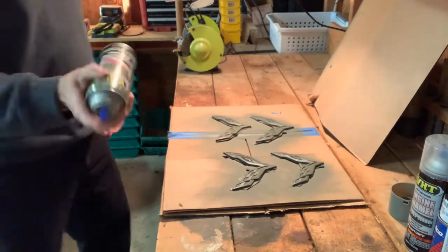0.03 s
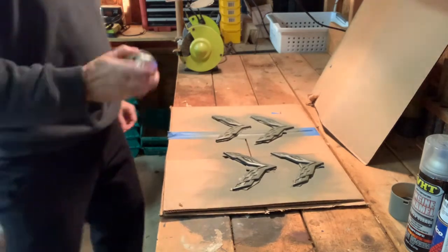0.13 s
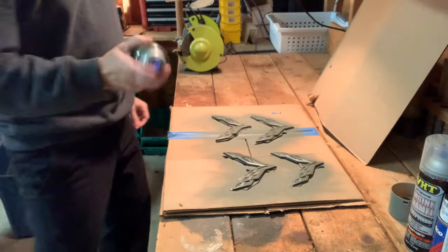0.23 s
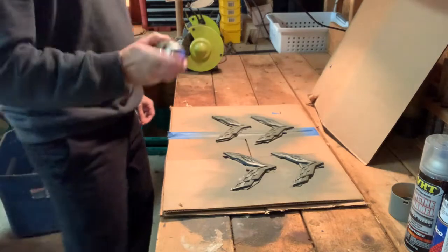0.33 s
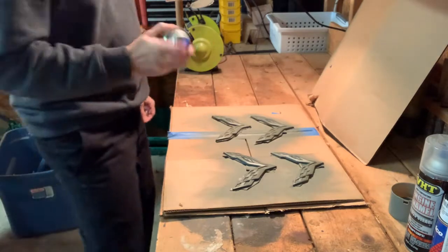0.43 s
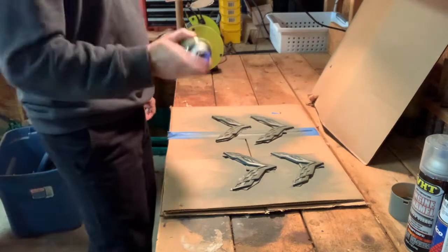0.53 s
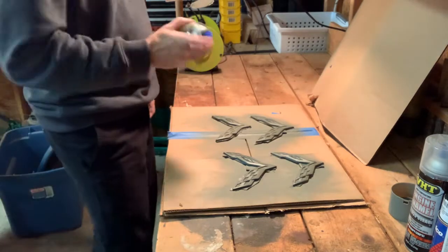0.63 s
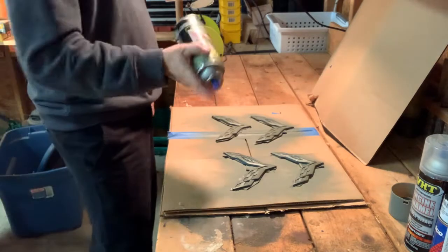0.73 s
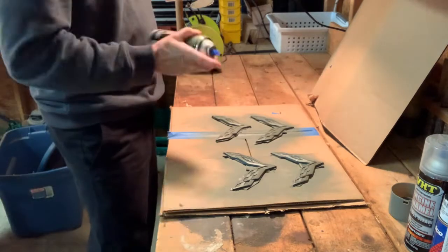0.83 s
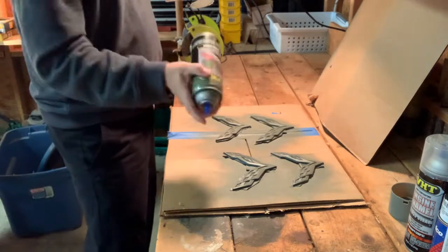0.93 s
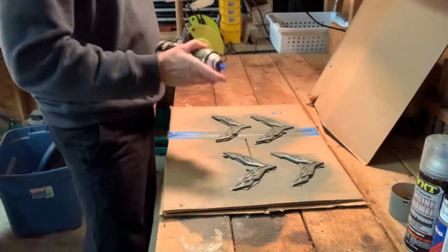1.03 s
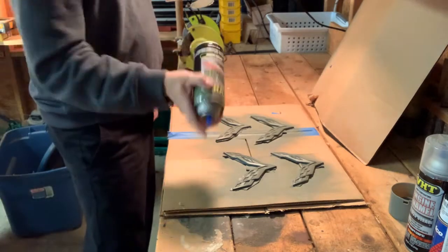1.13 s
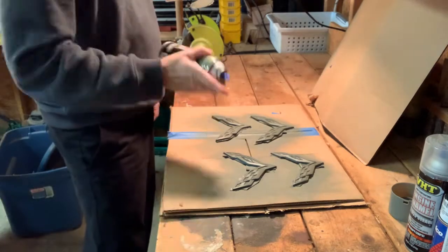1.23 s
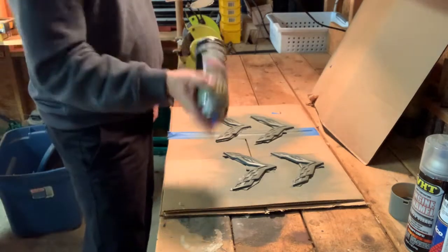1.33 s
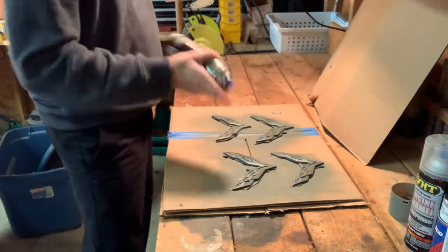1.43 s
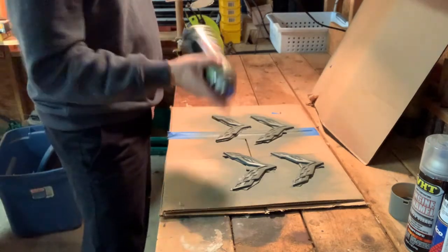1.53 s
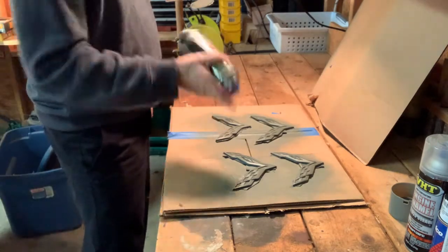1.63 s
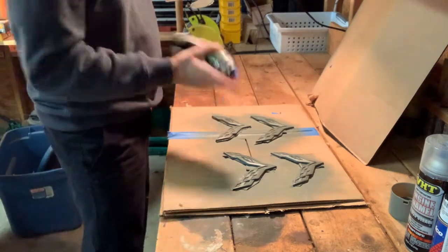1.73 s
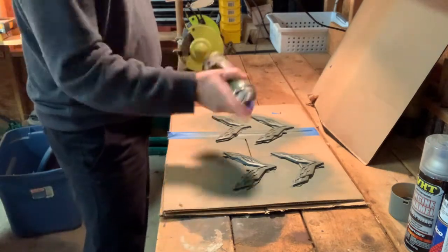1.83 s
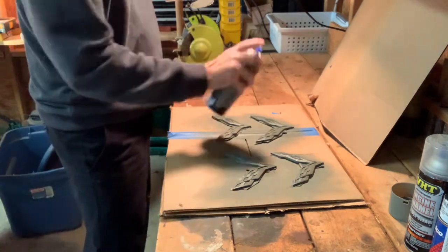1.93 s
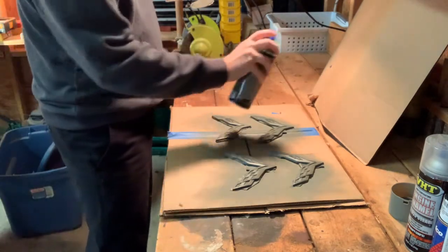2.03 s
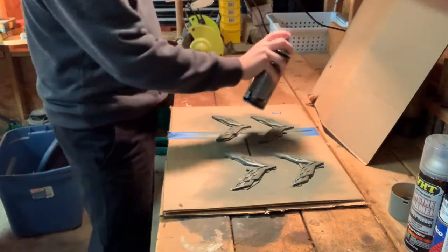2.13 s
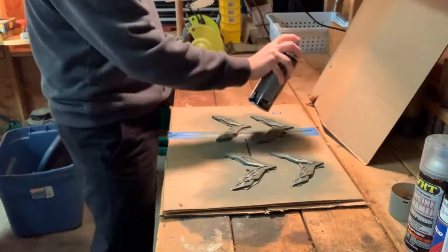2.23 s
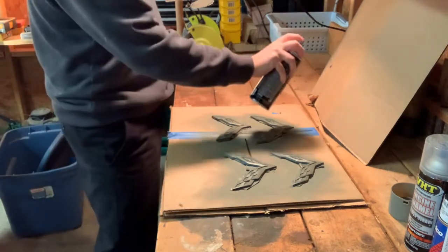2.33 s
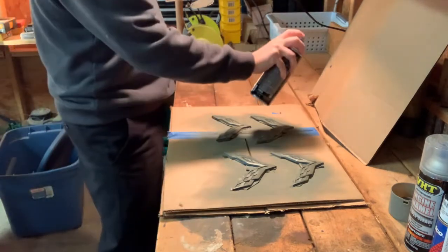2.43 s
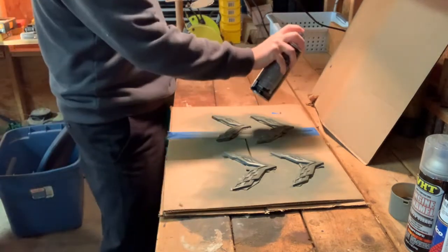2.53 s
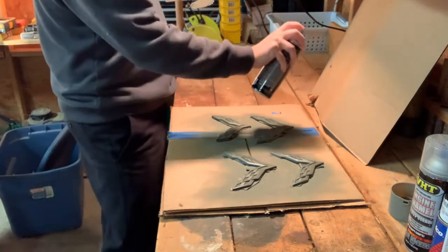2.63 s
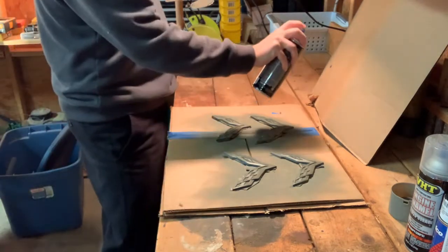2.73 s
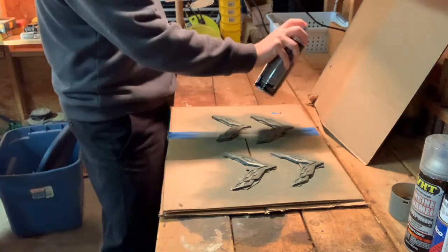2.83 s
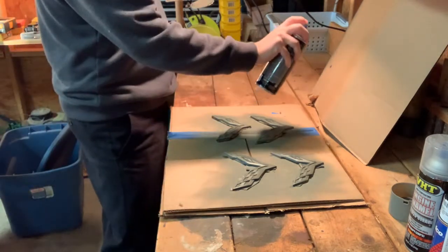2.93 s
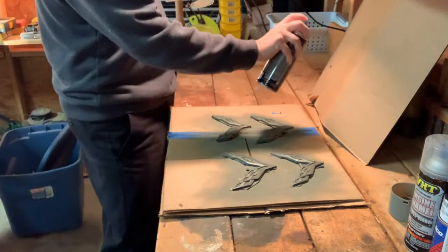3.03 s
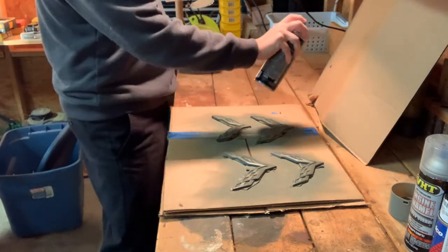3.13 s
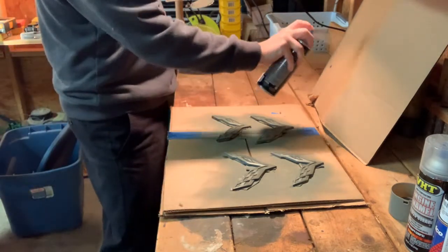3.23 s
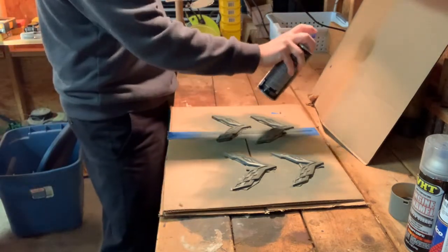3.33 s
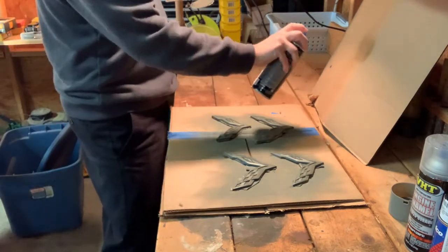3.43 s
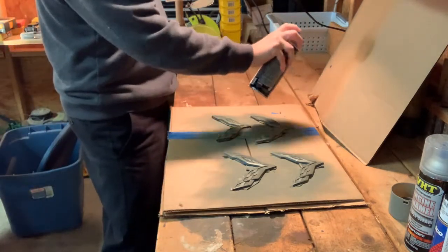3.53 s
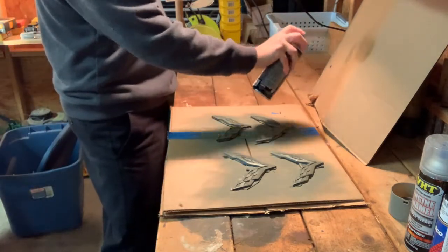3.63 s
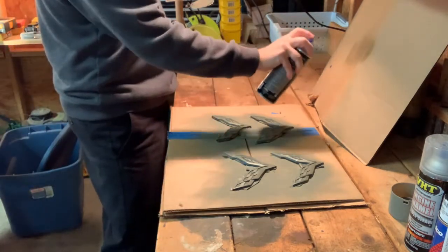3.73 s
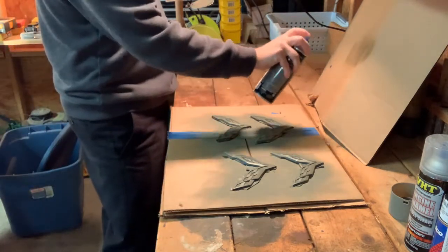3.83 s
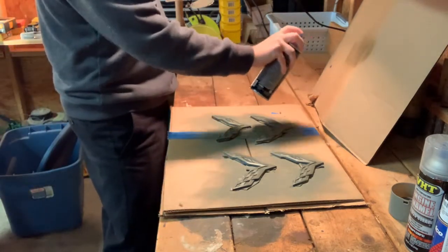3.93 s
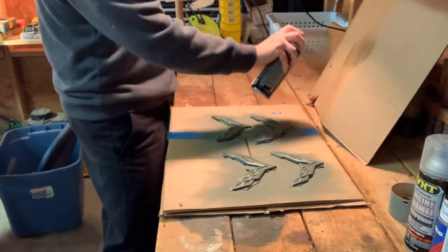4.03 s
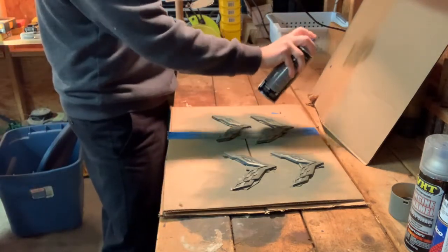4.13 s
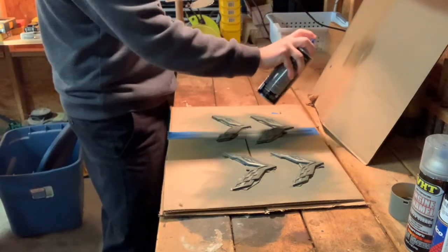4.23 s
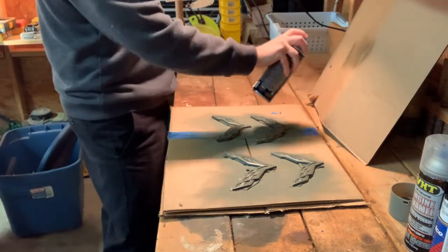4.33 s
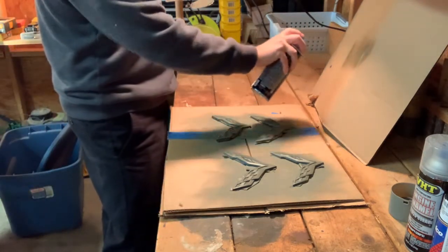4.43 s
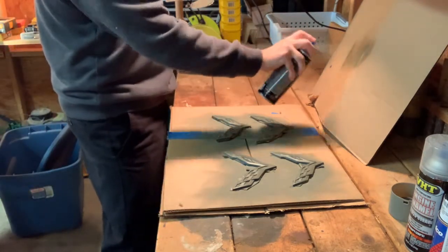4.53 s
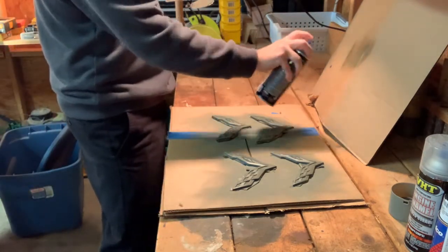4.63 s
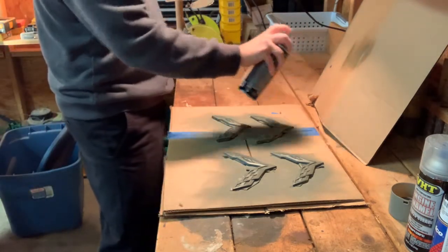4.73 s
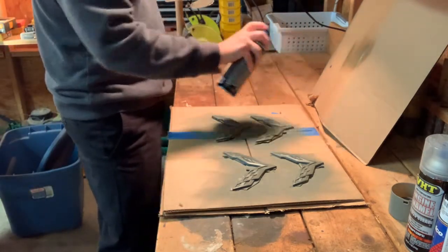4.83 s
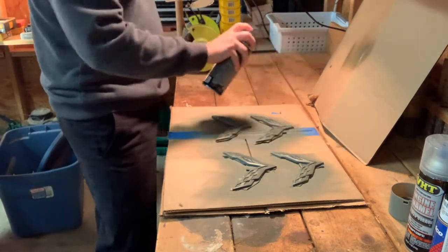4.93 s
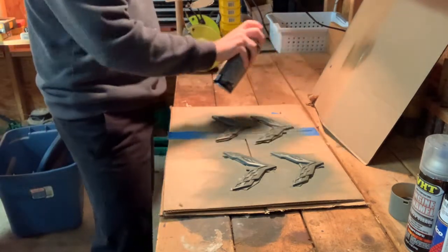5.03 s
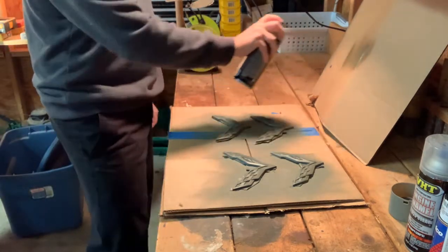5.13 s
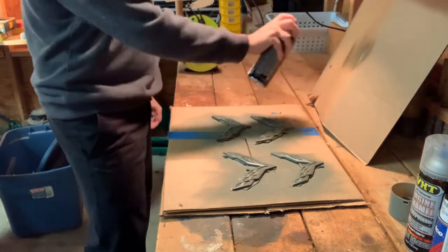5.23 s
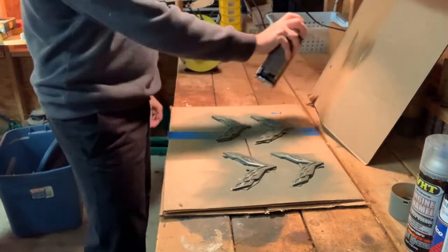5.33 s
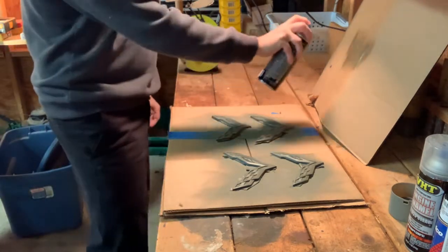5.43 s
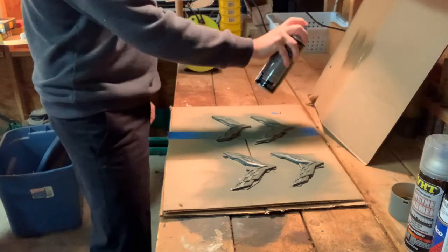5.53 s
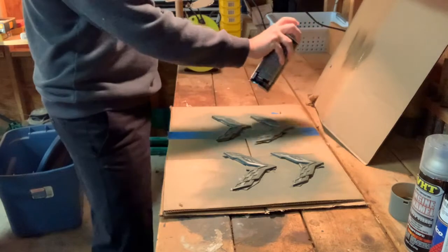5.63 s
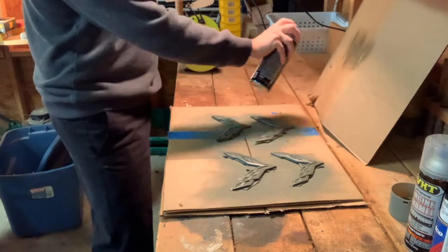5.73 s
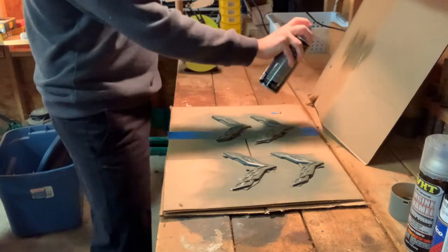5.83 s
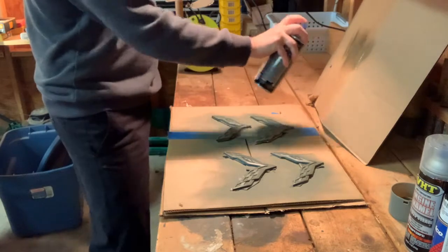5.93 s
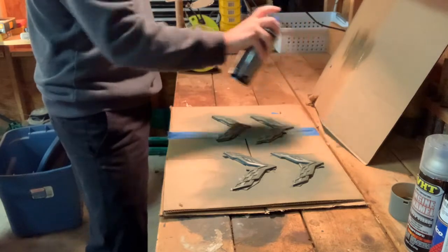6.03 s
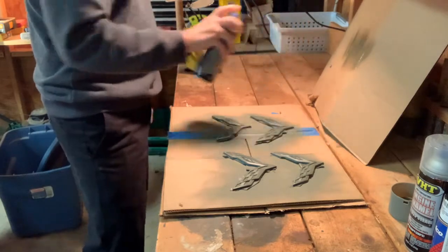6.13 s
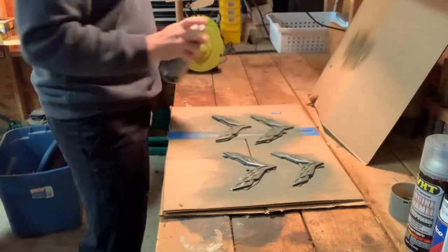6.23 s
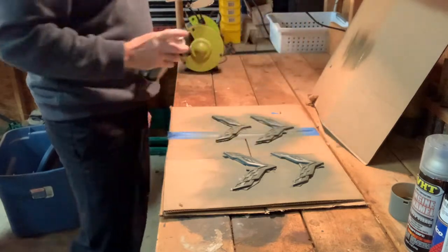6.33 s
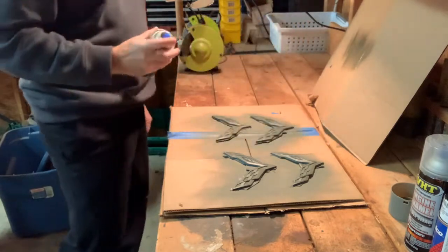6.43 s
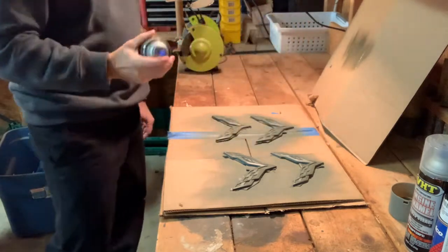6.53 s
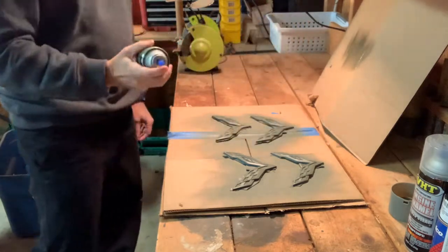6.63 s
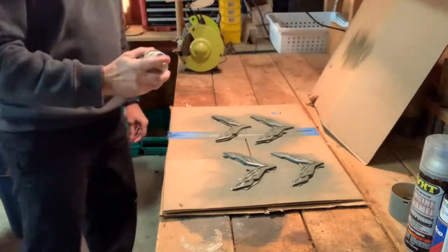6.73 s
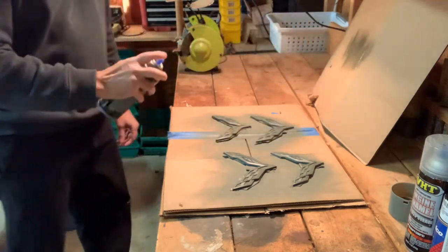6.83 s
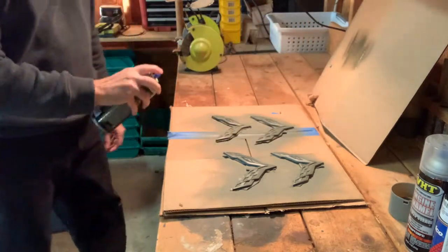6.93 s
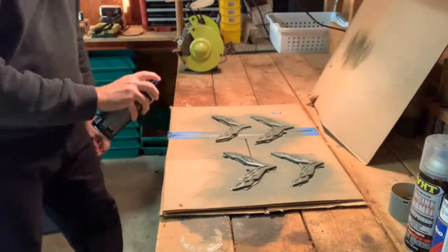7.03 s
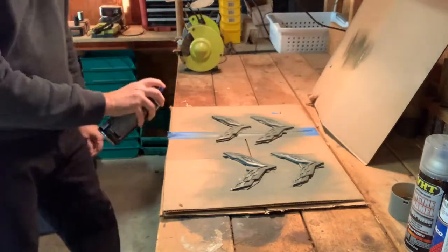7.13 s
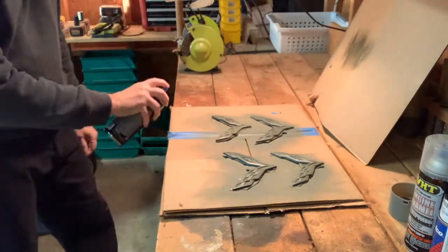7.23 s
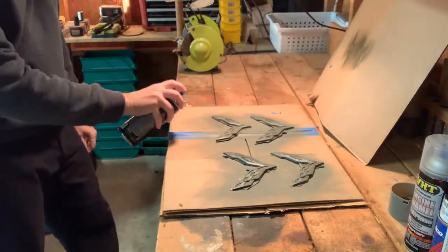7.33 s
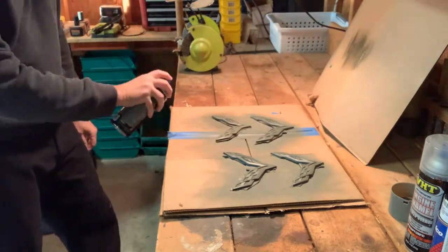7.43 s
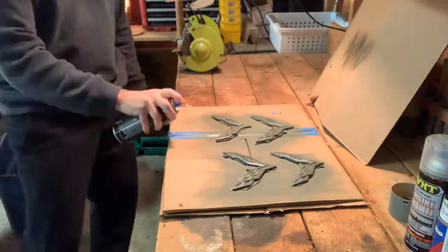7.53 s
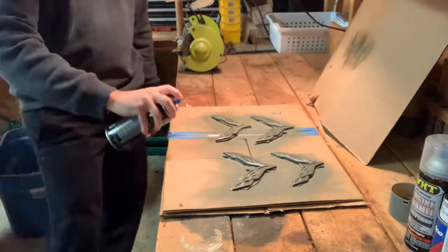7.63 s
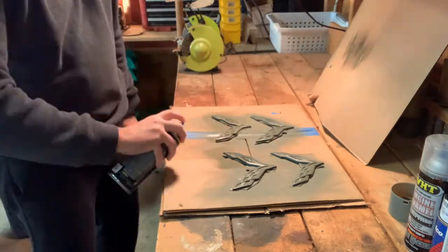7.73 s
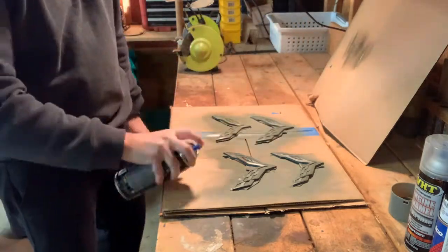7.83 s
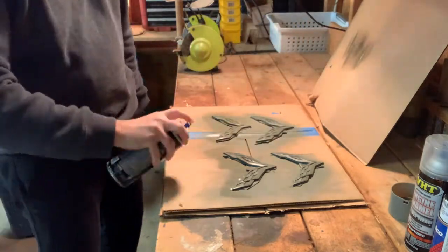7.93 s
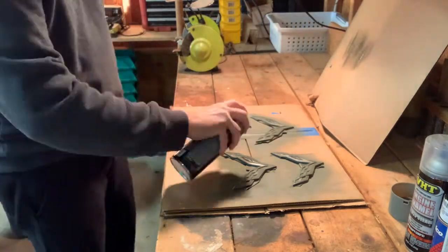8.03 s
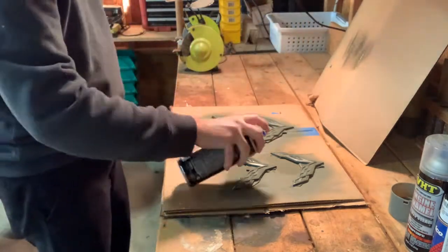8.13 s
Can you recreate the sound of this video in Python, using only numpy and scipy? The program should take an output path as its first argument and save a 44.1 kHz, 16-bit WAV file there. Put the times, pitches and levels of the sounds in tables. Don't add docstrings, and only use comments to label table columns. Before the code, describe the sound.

Rapid metallic ball rattle in a paint can runs down, followed by clicks and brief quiet aerosol hisses, ending in fast choppy noise bursts.

```python
import sys
import numpy as np
from scipy import signal
from scipy.fft import rfft, irfft, next_fast_len
from scipy.io import wavfile
from scipy.ndimage import uniform_filter1d, minimum_filter1d

SR = 44100
rng = np.random.default_rng(int(sys.argv[2]) if len(sys.argv) > 2 else 0)


def output_pcm(signal):
    pcm = np.clip(np.atleast_2d(signal).T, -1, 1) * 32767
    wavfile.write(sys.argv[1], SR, np.round(pcm).astype(np.int16))


def linear_from_db(decibels):
    return 10 ** (np.asarray(decibels, float) / 20)


N = 360738
TIME = np.arange(N) / SR
SPAN = next_fast_len(N, real=True)
HZ = np.fft.rfftfreq(SPAN, 1 / SR) + 1e-3


def on_log(table):
    hz, value = np.transpose(table)
    return np.interp(np.log(HZ), np.log(hz), value)


def level(x, db):
    return x * linear_from_db(db) / np.sqrt(np.mean(x ** 2))


def noise():
    return rng.standard_normal((3, N))


def colour(x, spectrum):
    gain = linear_from_db(on_log(spectrum))
    gain = gain / np.sqrt(np.mean(gain ** 2))
    return irfft(rfft(x, SPAN) * gain, SPAN)[:, :N]


def flicker(rate_hz, db):
    k = int(SR / rate_hz)
    steps = np.repeat(rng.standard_normal(N // k + 1), k)
    return linear_from_db(db * uniform_filter1d(steps, k)[:N])


def swell(x, below_hz, gain):
    low = signal.sosfiltfilt(signal.butter(2, below_hz, fs=SR, output="sos"), x)
    return x + low * (gain - 1)


def ring(modes, t, scatter_db, detune):
    hz, db, t60_s = np.transpose(modes)[:, :, None]
    strength, pitch = rng.standard_normal((len(modes), 2)).T[:, :, None]
    fade = linear_from_db(db + scatter_db * strength) * np.exp(-np.log(1000) * t / t60_s)
    turn = 1.2 * rng.standard_normal((3, len(modes), 1))
    out = (fade * np.sin(2 * np.pi * hz * (1 + detune * pitch) * t + turn)).sum(axis=1)
    return out / np.abs(out).max(axis=1, keepdims=True)


# mode_hz, level_db, t60_s
CAN = [(3170, -5, 0.053), (3420, -2, 0.03), (3360, -7.5, 0.028), (3600, -4, 0.022), (3800, -2, 0.03),
       (3960, -5, 0.05), (4220, 0.5, 0.022), (4342, -3, 0.024), (4705, -1.5, 0.023), (5627, -4, .014),
       (5800, -6.5, 0.016)]
# mode_hz, level_db, t60_s
DOME = [(1474, -1, 0.018), (1830, -11, 0.0052), (2005, 1.5, 0.016), (2159, -1, 0.072), (2654, -5, 0.015)]
# mode_hz, level_db, t60_s
THUD = [(290, -13.5, 0.18), (470, -11.5, 0.091), (872, -2.5, 0.046), (1076, 9, 0.012), (1240, 7.5, 0.015)]
# freq_hz, density_db
TICK = [(4000, -24.5), (6500, 0.5), (9500, -3), (11500, -5.5), (14000, -9.5), (16000, -16.5)]
# freq_hz, density_db
CLATTER = [(500, -20.5), (1200, -12.5), (2100, -6), (2700, -5.5), (3700, -5), (4600, -7.5), (6000, -5.5),
           (9000, -26)]
TICK_DB, TICK_PER_RING = -10, -0.17
SPOT_WIDTH_HZ = 230
SLIDE_DB, SLIDE_S = -22.5, .003
CONTACT_S, PAINT_PUSH_S, CHOKED_S = 0.0004, 0.0021, .016


def ball(hits, bright_db, spots_hz):
    body, tick, rebounds = np.zeros((3, 3, N + 3072))
    t = np.arange(3072) / SR
    touch = 1 - np.exp(-(t / CONTACT_S) ** 2)
    push = 1 - np.exp(-(t / PAINT_PUSH_S) ** 2)
    grip = 0.3 + np.exp(-(t / 0.0028) ** 2)
    for (start_s, db, thud_db, dome_db), extra_db, spot_hz in zip(hits, bright_db, spots_hz):
        tick_db = TICK_DB + TICK_PER_RING * db + extra_db
        start = int(start_s * SR)
        here = slice(start, start + len(t))
        struck = [(hz, v - min(3 * ((hz - spot_hz) / SPOT_WIDTH_HZ) ** 2, 9.0), t60_s) for hz, v, t60_s in CAN]
        wall = ring(struck, t, scatter_db=2.5, detune=.03)
        wall = wall + linear_from_db(dome_db + .3) * ring(DOME, t, scatter_db=3.5, detune=.04)
        wall = wall + linear_from_db(thud_db + 6.5) * push * ring(THUD, t, scatter_db=1.5, detune=0.087)
        body[:, here] += linear_from_db(db + 1.0) * touch * grip * wall
        tick_fade = np.exp(-t / 0.001) + 0.18 * np.exp(-t / 0.01)
        tick[:, here] += linear_from_db(db + tick_db + 1.0) * touch * tick_fade
        lead = t[:start][::-1]
        rebounds[:, start - len(lead):start] += linear_from_db(db + SLIDE_DB) * np.exp(-lead / SLIDE_S)
        rebounds[:, here] += linear_from_db(db - 23) * touch * np.exp(-t / CHOKED_S)
    rebounds = rebounds[:, :N] * flicker(400, 3.0)
    return body[:, :N] + colour(tick[:, :N] * noise(), TICK) + colour(rebounds * noise(), CLATTER)


def rolling(tables, low_shape, high_shape, grain_db):
    low_db, high_db = np.full((2, N), -120.)
    for rows in tables:
        at_s, db, high_rel_db = np.transpose(rows)
        inside = (TIME > at_s[0] - .02) & (TIME < at_s[-1] + .02)
        low_db[inside] = np.interp(TIME[inside], at_s, db)
        high_db[inside] = low_db[inside] + np.interp(TIME[inside], at_s, high_rel_db)
    grain = flicker(250, grain_db) * flicker(45, grain_db)
    low = uniform_filter1d(linear_from_db(low_db + 3.5), size=600) * colour(grain * noise(), low_shape)
    high = uniform_filter1d(linear_from_db(high_db + 3.0), size=600) * colour(grain * noise(), high_shape)
    return low + high


# start_s, ring_db, thud_rel_db, dome_rel_db
BLOWS = [(0.0286, -10.5, -12.5, -9.5), (0.1327, 1.5, -30.5, -25.5), (0.2734, -9, -15, -8),
         (0.3916, -8, -28, -22.5), (0.4969, -8.5, -20.5, -7.5), (0.5019, -7, -12.5, -11.5),
         (.563, -2, -17, -20), (0.5812, -4, -29, -16.5), (0.6807, -14.5, -11.5, -4.5),
         (0.7765, -8.5, -15.5, -13), (0.7925, -3, -27, -22.5), (.922, -5, -9, -11), (0.993, 0, -22, -3.5),
         (1.008, -7.5, -23.5, -12), (1.0926, -8.5, -11.5, 0), (1.1096, -6, -9, -8.5),
         (1.1984, -5, -15, -13), (1.218, -3, -27, -13.5), (1.222, -5, -13.5, -21.5), (1.3254, -2, -14, -8),
         (1.4221, -11, -39, -5), (1.4357, 1.5, -38.5, -10), (1.4431, -8.5, -25, -8.5),
         (1.5488, -5.5, -16, -4), (1.5538, -14, -10.5, -7.5), (1.66, -3, -25.5, -21.5),
         (1.7894, -15.5, -4.5, -17.5), (1.7939, -8.5, -8, -10), (1.8666, 0, -17, -17.5),
         (1.8882, -6.5, -26.5, -13)]
FLIGHT_S, FLIGHT_DB = 0.057, -5


def flight():
    lands_s = np.sort(np.transpose(BLOWS)[0])
    wait_s = np.append(lands_s, 99)[np.searchsorted(lands_s, TIME)] - TIME
    return linear_from_db(FLIGHT_DB * np.clip(1 - wait_s / FLIGHT_S, 0, 1))


# start_s, ring_db, thud_rel_db, dome_rel_db
MORE_KNOCKS = [(.0005, -37, -7.5, -9), (0.0489, -32, -1, 12), (0.057, -13.5, -7, -2), (0.0754, -20.5, -6, -8),
               (0.164, -13, -37.5, -20.5), (0.1908, -30.5, -33, 5), (0.3143, -24.5, 2, 4.5),
               (0.3706, -24.5, -3.5, 2.5), (0.549, -22, -5, -6), (.57, -11, -14, -14.5),
               (0.6577, -15, -14.5, -0.5), (0.7399, -26.5, -6.5, -8), (0.8058, -22, -25.5, -4.5),
               (0.8183, -13, -16, -18.5), (0.919, -13.5, -21, -8), (0.967, -22.5, 4, -7),
               (1.005, -11, -13, -5.5), (1.0292, -20, -11.5, -16.5), (1.066, -31.5, -7, 10),
               (1.231, -21, -9, -11), (1.2665, -27.5, 6, -0.5), (1.3816, -27.5, -32.5, 1.5),
               (1.393, -26, 0.5, 2), (1.455, -23, -13.5, -9.5), (1.5758, -36.5, -5.5, 13),
               (1.6138, -23, 7, -14), (1.637, -19.5, -1, -9), (1.6791, -8.5, -23.5, -15.5),
               (1.684, -9.5, -20, -23), (1.851, -23, -3, -3)]
# start_s, ring_db, thud_rel_db, dome_rel_db
RUN_DOWN = [(1.9605, -29, 3.5, 5.5), (1.9667, -35.5, 5.5, 9.5), (1.996, -49, 8, 15),
            (2.0381, -14, -13.5, -4.5), (2.091, -20, -3, -12), (2.094, -20, -19, -23), (2.135, -36.5, 9, 5),
            (2.168, -28.5, 1, 3.5), (2.177, -25, -6, -6), (2.2514, -33, 5.5, 4), (2.2673, -30.5, 0.5, -3),
            (2.2797, -27, -9, -0.5), (2.3158, -44, 0, -1), (2.3336, -48.5, -5, 15.5),
            (2.344, -32, 0.5, 0.5), (2.353, -34.5, -34, 5), (2.4014, -29.5, -31, -5),
            (2.4339, -36.5, -7, -4), (2.4443, -47, -8, 4), (2.4649, -37.5, -15.5, -4)]
# start_s, ring_db, thud_rel_db, dome_rel_db
EXTRA_KNOCKS = [(.2135, -32.5, -2, 1), (0.3659, -31, -13, 5), (0.4396, -28.5, -10, 0), (0.7691, -25, -2, 2),
                (.828, -22.5, -21, -12), (1.022, -19, -9, -11), (1.402, -26.5, -2, 5.5), (1.471, -27, -19, -3),
                (1.8297, -31, -7, -5.5), (2.06, -35.5, 0, 2), (2.2344, -41, -14, 3), (2.5, -55, -13, -7),
                (.1405, -15, -34, -12.5), (0.5913, -21, -29, -14)]
# start_s, ring_db, tick_extra_db
GRAZES = [(.0383, -34, 3.5), (.0525, -33, 5), (.307, -45, 6), (.4004, -27.5, 2.5), (.5765, -20, -0.5),
          (.635, -42, 7), (.646, -43, 8), (.7217, -48.5, 4.5), (.7628, -39, 7), (.7875, -26.5, 5),
          (.9985, -16, -1), (1.4094, -43.5, 6), (1.4765, -35, -2), (1.629, -43.5, 1), (1.741, -41.5, 4),
          (1.8052, -30, 4), (1.2345, -24, 3), (.7932, -5.5, -3)]
GRAZE_THUD_DB, GRAZE_DOME_DB = -11, -9.5
BLOW_TICK_DB = [-4.5, -1.5, -4.5, -1, -3.5, -2.5, 0.5, 2, 0.5, 1.5, 2, -4, -2, 1.5, -1, 0, 3, 1, 2, -0.5, 0,
                1, 2, -0.5, -1.5, -3.5, -1.5, -1, -7, -3.5]
MORE_KNOCK_TICK_DB = [-5, -1, -3.5, 2, -2, 1, 3, 3.5, 1, 0.5, 0, 1.5, 0, 1.5, 0, 7.5, 10.5, 5.5, 1.5, 0.5, 0.5,
                      0.5, 4.5, 2, -1.5, 4, -0.5, 0, -1.5, -2]
RUN_DOWN_TICK_DB = [1.5, -5, -2, 2.5, 2, -6, 8.5, 4.5, 2, -0.5, 1, 2.5, 0, 8, 0.5, -1, -0.5, -4, -0.5, -2.5]
EXTRA_KNOCK_TICK_DB = [-0.5, 2, 2.5, 7, -1, 1, 0.5, 1, 1, -4, 4, 2, -1, -1.5]
BLOW_HZ = [3727, 4090, 3910, 4332, 3810, 3752, 3893, 3678, 3918, 3404, 3610, 4160, 3499, 4067, 3960, 4053,
           3575, 3704, 3784, 3877, 3587, 3410, 3690, 4020, 4170, 3610, 3800, 3680, 3850, 4055]
MORE_KNOCK_HZ = [3790, 3970, 3780, 4106, 3720, 3440, 3900, 4240, 4188, 3803, 4057, 3740, 3680, 3590, 4060, 3640,
                 3899, 3987, 3640, 3584, 3600, 3730, 3690, 3720, 3800, 4120, 4270, 3600, 4082, 3950]
RUN_DOWN_HZ = [4100, 3510, 3810, 3412, 3803, 3510, 4100, 3960, 4040, 4020, 3830, 3870, 3820, 4080, 3920,
               3940, 3970, 4052, 4020, 4050]
EXTRA_KNOCK_HZ = 3800
# at_s, low_db, high_rel_db
ROLL_HARD = [
    [(0.0, -44.5, 5.5), (.35, -49.5, -20), (.7, -44, -4), (1.1, -52.5, -13), (1.54, -45.5, -12),
     (1.9, -50, -2.5), (2.1, -54, -0.5), (2.3, -56, -1), (2.48, -66, 1.5), (2.64, -91, -2)],
    [(6.69, -74, -4), (6.725, -50.5, -15), (6.775, -71, -6), (6.81, -55, -2), (6.92, -64, 3),
     (7.03, -74, -10), (7.11, -83, -12), (7.17, -78, -12.5), (7.27, -95, 0)],
]
# freq_hz, density_db
ROLL_LOW = [(300, -27), (900, -4.5), (1300, -1), (2050, 0), (2500, -1.5), (2900, -16)]
ROLL_HIGH = [(2500, -17.5), (3200, -4), (3900, -4), (4500, -5), (5500, -8.5), (9000, -23), (12000, -26.5),
             (15500, -46)]


def shaking():
    grazes = [(start_s, db, GRAZE_THUD_DB, GRAZE_DOME_DB) for start_s, db, _ in GRAZES]
    graze_tick_db = [row[2] for row in GRAZES]
    bright_db = BLOW_TICK_DB + MORE_KNOCK_TICK_DB + RUN_DOWN_TICK_DB + EXTRA_KNOCK_TICK_DB + graze_tick_db
    common_hz = np.full(len(EXTRA_KNOCKS + GRAZES), EXTRA_KNOCK_HZ)
    spots_hz = np.concatenate([BLOW_HZ, MORE_KNOCK_HZ, RUN_DOWN_HZ, common_hz])
    knocks = ball(BLOWS + MORE_KNOCKS + RUN_DOWN + EXTRA_KNOCKS + grazes, bright_db, spots_hz)
    return knocks + flight() * rolling([ROLL_HARD[0]], ROLL_LOW, ROLL_HIGH, grain_db=2.5)


SILENT_DB = -100
SLOSH_SAG_DB, SLOSH_RISE_DB_S, SLOSH_FALL_DB_S = -4, 315, 226


def slosh(start_s, hold_s, db, high_db):
    end_db = db + SLOSH_SAG_DB
    rise_s = (db - SILENT_DB) / SLOSH_RISE_DB_S
    fall_s = (end_db - SILENT_DB) / SLOSH_FALL_DB_S
    return [(start_s - rise_s, SILENT_DB, high_db), (start_s, db, high_db),
            (start_s + hold_s, end_db, high_db), (start_s + hold_s + fall_s, SILENT_DB, high_db)]


# start_s, ring_db, dome_rel_db
RATTLE = [(6.6983, -51.5, -1), (6.714, -38.5, 1), (6.7248, -54, 9.5), (6.7448, -42, 4), (6.7885, -22.5, -8),
          (6.7941, -23, -13), (6.8071, -46, 8), (6.8175, -42, -10), (6.8241, -42, -1), (6.8314, -45, 5.5),
          (6.8445, -30, -26), (6.8631, -38.5, -5), (6.8962, -21.5, -29), (6.9446, -29, -16),
          (6.977, -31, -14), (7.0576, -44.5, -25.5), (6.7205, -52, 7), (6.878, -46, -12.5),
          (7.1761, -66, -10), (5.05, -72, -5), (5.098, -60, 5), (5.112, -60.5, -1), (5.142, -66, 5),
          (5.985, -52, -3), (6.04, -60.5, -6)]
LOOSE_THUD_DB, THUD_PER_RING = -33, -0.45
LOOSE_TICK_DB, LOOSE_HZ = 0.5, 3600
# freq_hz, gain_db
UPRIGHT = [(1200, 3), (2100, 3), (3500, 2.5), (4300, -1), (6500, 0), (9000, 0)]
# start_s, hold_s, low_db, high_rel_db
SLOSH = [
    (3.386, 0.11, -67.5, -13.5),
    (3.877, 0.075, -73.5, -14),
    (4.308, 0.092, -71, -6.5),
    (4.685, 0.042, -64, -5),
    (5.044, 0.068, -64.5, 1),
    (5.976, 0.15, -70.5, 1),
]
# freq_hz, density_db
SLOSH_LOW = [(700, -20), (1400, -11), (1750, -1.5), (2050, 0), (2300, -7), (2700, -16), (3500, -35)]
SLOSH_HIGH = [(2600, -20), (3200, -8), (3600, -2), (3900, -7), (4300, -10), (4900, -10), (5500, -17),
              (12000, -26), (16000, -36)]


def loose_rattle():
    hits = [(start_s, db, LOOSE_THUD_DB + THUD_PER_RING * db, dome_db) for start_s, db, dome_db in RATTLE]
    knocks = ball(hits, [LOOSE_TICK_DB] * len(hits), [LOOSE_HZ] * len(hits))
    slops = [slosh(*row) for row in SLOSH]
    return colour(knocks, UPRIGHT) + rolling([ROLL_HARD[1]] + slops, SLOSH_LOW, SLOSH_HIGH, grain_db=1.8)


def gate(rows, rise_s, fall_s, extra_db=0):
    gain = np.zeros(N)
    for start_s, end_s, db in rows:
        opening = np.clip((TIME - start_s) / rise_s + .5, 0, 1) ** 2
        closing = np.clip((end_s - TIME) / fall_s + .5, 0, 1) ** 2
        gain += linear_from_db(db + extra_db) * opening * closing
    return gain


# start_s, end_s, level_db
SPRAY = [
    (3.174, 3.371, -51.5),
    (3.635, 3.85, -53),
    (4.039, 4.293, -52.5),
    (4.495, 4.664, -52.5),
    (5.29, 5.574, -54),
    (5.752, 5.946, -54.5),
]
# opening_db, middle_db, closing_db
SPRAY_BODY_DB = [
    (-8.5, -3.5, -9),
    (-2.5, -11.5, -5),
    (-8.5, -13.5, -3),
    (-7, -10.5, -10),
    (-2.5, -12, -5.5),
    (-5.5, -10, -5.5),
]
# start_s, end_s, level_db
LEAK = [
    (6.615, 6.67, -58.5),
]
# freq_hz, density_db
JET_BODY = [(300, -7.5), (700, -12), (1200, -6.5), (1900, -4), (3000, 4), (4400, 2.5), (5600, 0.5),
            (7000, -4.5), (9000, -21)]
JET_TOP = [(3000, -39), (5500, -31), (7000, 1.5), (9000, 8), (10500, 3.5), (13000, 6.5), (15300, 6.5),
           (16000, -7)]
SPLUTTER_S = 0.058
COPY_LAG_S, COPY_DRIFT, COPY_DB = .00046, .09, -7


def jet():
    top = gate(SPRAY, 0.0215, 0.0059, 4.9) + gate(LEAK, 0.02, 0.058)
    top = top * flicker(60, 0.58) * colour(noise(), JET_TOP)
    stages_s = np.array(SPRAY)[:, [0, 0, 1, 1]] + [0, SPLUTTER_S, -SPLUTTER_S, 0]
    stages_db = np.array(SPRAY_BODY_DB)[:, [0, 1, 1, 2]]
    wetness = linear_from_db(np.interp(TIME, stages_s.ravel(), stages_db.ravel()))
    early = np.subtract(SPRAY, [.006, 0, 0])
    body = gate(early, 0.025, 0.0038, 7.4) * wetness + gate(LEAK, 0.033, 0.055, -1.6)
    wet = body * flicker(40, 1.5) * colour(noise(), JET_BODY)
    drift = np.log(flicker(11, 20 / np.log(10)))
    late_s = TIME - COPY_LAG_S * np.exp(COPY_DRIFT * drift)
    late_copy = np.array([np.interp(late_s, TIME, w) for w in wet])
    return top + wet + linear_from_db(COPY_DB) * late_copy


# start_s, peak_db, centre_hz
CLICKS = [
    (2.647, -66, 4967),
    (2.666, -46, 4490),
    (2.8768, -65, 5410),
    (3.034, -62.5, 4467),
    (4.648, -40, 4538),
    (5.185, -67, 4140),
    (5.9291, -49, 4600),
    (6.389, -69, 4875),
]


def clicks():
    out, t = np.zeros((3, N)), np.arange(2048) / SR
    fade = np.exp(-t / 0.00037) + 0.12 * np.exp(-t / 0.0097)
    for start_s, db, hz in CLICKS:
        band = signal.butter(2, [hz * .65, hz * 1.45], "bandpass", fs=SR, output="sos")
        snap = signal.sosfilt(band, fade * rng.standard_normal((3, len(t))))
        snap = snap / np.abs(snap).max(axis=1, keepdims=True)
        out[:, int(start_s * SR):][:, :len(t)] += linear_from_db(db + 11.0) * snap
    return out


ROOM_T60_S, ROOM_TOP_T60_S = 0.33, 0.07


def room(x, db):
    t = np.arange(int(.4 * SR)) / SR
    white = rng.standard_normal((3, len(t))) * (1 - np.exp(-t / 0.0011))
    low = signal.sosfilt(signal.butter(1, 4000, fs=SR, output="sos"), white)
    tail = low * np.exp(-np.log(1000) * t / ROOM_T60_S)
    tail = tail + (white - low) * np.exp(-np.log(1000) * t / ROOM_TOP_T60_S)
    return x + signal.fftconvolve(x, linear_from_db(db) * tail / np.sqrt((tail[0] ** 2).sum()), axes=1)[:, :N]


def ports(three, alike, phase):
    shared, left, right = rfft(three, SPAN)
    share = np.clip(on_log(alike), 0, 1)
    turn = np.exp(.5j * np.interp(HZ, *np.transpose(phase)))
    common = np.sqrt(share) * shared * np.array([1 / turn, turn])
    private = np.sqrt(1 - share) * np.array([left, right])
    return irfft(common + private, SPAN)[:, :N]


# start_s, end_s, level_db
FAST = [(7.37, 7.4, -41.5), (7.427, 7.453, -42.5), (7.499, 7.536, -43.5), (7.56, 7.604, -42.5),
        (7.624, 7.658, -42.5), (7.743, 7.776, -41), (7.801, 7.829, -43), (7.869, 7.9, -40.5),
        (7.936, 7.975, -41.5), (8.007, 8.043, -41.5), (8.099, 8.132, -42.5), (8.157, 8.18, -40.5)]
# freq_hz, density_db
FAST_SHOP = [(150, -33), (330, -13.5), (470, -1), (650, -12), (850, -5), (1200, -14.5), (2000, -14),
             (3000, -18.5), (4500, -28), (16000, -36.5)]
FAST_JET = [(30, 0.5), (1000, -0.5), (5000, -1), (12000, -2), (15500, -4.5)]
FAST_SHOP_DB = -30
# freq_hz, share_0_1
FAST_ALIKE = [(300, 0.5), (1000, 0.049), (4000, 0.099), (16000, 0.16)]
# freq_hz, phase_rad
FAST_PHASE = [(30, 3), (1000, -3), (2000, 6.5), (10300, -0.5), (11700, 1.5), (14500, -2)]


def fast_forward():
    hum = level(colour(noise(), FAST_SHOP), FAST_SHOP_DB)
    hum = swell(hum, 1100, flicker(30, 2.0)) * flicker(44, 1.65)
    bursts = gate(FAST, 0.0033, 0.0061, 24.0) * flicker(150, 1.7) * colour(noise(), FAST_JET)
    return ports(hum + bursts, FAST_ALIKE, FAST_PHASE)


# freq_hz, density_db
SHOP = [(25, -24), (45, -7.5), (60, 0), (80, -5.5), (105, -2.5), (190, -14.5), (300, -11.5), (450, -25.5),
        (1000, -34.5), (2500, -41.5), (6500, -45), (13000, -48), (16000, -61.5)]
SHOP_DB = -61
# at_s, level_db
RUMBLE = [(0.0, -66), (0.08, -59), (0.18, -65.5), (0.6, -60), (0.7, -69), (0.89, -51), (0.97, -63),
          (1.39, -61.5), (1.43, -66), (2.99, -61), (3.01, -68), (4.52, -61), (7.15, -63.5), (7.25, -62)]
# freq_hz, share_0_1
SHOP_ALIKE = [(40, .88), (130, .6), (290, .35), (640, .1), (7000, .1), (9000, .8), (11000, .2)]
# freq_hz, phase_rad
RATTLE_PHASE = [(30, 0), (4100, -.2), (6200, -1.6), (9000, -3.14), (11700, -4.9), (13800, -6.28),
                (16000, -6.3)]
FOOT_S, FOOT_HZ, FOOT_HALF_S, FOOT_DB = .875, 60, .03, -48


def shop():
    foot = np.exp(-((TIME - FOOT_S) / FOOT_HALF_S) ** 2) * np.sin(2 * np.pi * FOOT_HZ * TIME)
    at_s, machine_db = np.transpose(RUMBLE)
    machine = linear_from_db(np.interp(TIME, at_s, machine_db - machine_db.mean())) * flicker(9, 1.5)
    rumble = swell(level(colour(noise(), SHOP), SHOP_DB), 260, machine)
    return linear_from_db(FOOT_DB) * foot + ports(rumble, SHOP_ALIKE, RATTLE_PHASE)


# freq_hz, phase_rad
SHAKE_PHASE = [(30, 0), (700, .9), (3400, .7), (6200, 2.4), (6900, 3.5), (9000, 3.14), (11700, 1.4),
               (13800, 0), (16000, -.6)]
JET_PHASE = [(30, 0), (2750, 3), (4800, 4.8), (6200, 5.2), (6900, 3.9), (9000, 3.14), (11700, 1.4),
             (13800, 0), (16000, -.7)]
# freq_hz, share_0_1
NEAR_ALIKE = [(300, 0.7), (2200, 0.2), (3500, 0.6), (5500, 0.5), (7800, 0.5), (9000, 0.8), (10500, 0.4),
              (12000, 0.5), (16000, .9)]
JET_ALIKE = [(300, .4), (3000, .7), (5500, .35), (7800, .7), (9000, .99), (10500, .72), (13800, .95),
             (16000, .7)]
# freq_hz, tilt_db
PORT_TILT = [(40, 4), (130, 3), (300, .3), (1200, -2), (5000, -1.5), (8000, 0)]
# at_s, gain_0_1
CHANGE = [
    (7.262, 0.96),
    (7.288, 0.04),
    (7.292, 0),
    (7.33, 0.17),
]


def scene():
    near = ports(room(shaking(), -14.5), NEAR_ALIKE, SHAKE_PHASE)
    near += ports(room(loose_rattle(), -14.5), NEAR_ALIKE, RATTLE_PHASE)
    near += ports(room(jet() + clicks(), -10.0), JET_ALIKE, JET_PHASE)
    near = signal.sosfilt(signal.butter(3, 230, "highpass", fs=SR, output="sos"), near)
    tilt = linear_from_db(on_log(PORT_TILT) / 2)
    heard = irfft(rfft(near + shop(), SPAN) * np.array([tilt, 1 / tilt]), SPAN)[:, :N]
    fade = np.interp(TIME, *np.transpose(CHANGE)) ** 2
    return fade * np.where(TIME < CHANGE[1][0], heard, fast_forward())


def drop_out(margin_db, soft_db, depth_db):
    return linear_from_db(depth_db / (1 + np.exp(np.clip(margin_db / soft_db, -30, 30))))


# freq_hz, bar_db
STARVE_DB = [(300, -34), (600, -23), (1200, -16), (2000, -19), (3000, -11.5), (4300, -17), (5800, -11.5),
             (7800, -16), (9100, -5), (10000, -11)]
STARVE_LUCK_DB, STARVE_SOFT_DB, STARVE_DEPTH_DB = 4, .8, -24
AHEAD_DB, AHEAD_SOFT_DB, AHEAD_DEPTH_DB, AHEAD_HZ = -28, 1.5, -22, 7200


def starve(x):
    cross = np.array([[1, 1], [1, -0.98]]) / np.sqrt(2)
    hz, _, z = signal.stft(cross @ x, SR, nperseg=1024)
    power = np.abs(z) ** 2 + 1e-18
    hiss = power[:, (hz > 10000) & (hz < 15000)].mean(axis=(0, 1))
    patch = uniform_filter1d(uniform_filter1d(power, size=5, axis=1), size=3, axis=2)
    luck = rng.standard_normal((len(hz) // 5 + 1, len(hiss) // 3 + 1))
    luck = np.kron(luck, np.ones((5, 3)))[:len(hz), :len(hiss)]
    bar_db = np.interp(hz, *np.transpose(STARVE_DB))[:, None] + STARVE_LUCK_DB * luck
    keep = drop_out(10 * np.log10(patch / hiss) - bar_db, STARVE_SOFT_DB, STARVE_DEPTH_DB)
    kept = z * np.where(hz[:, None] < 10000, keep, 1)
    x = cross @ signal.istft(kept, SR, nperseg=1024)[1][:, :N]
    high = signal.sosfiltfilt(signal.butter(4, AHEAD_HZ, "highpass", fs=SR, output="sos"), x)
    now = uniform_filter1d((high ** 2).sum(axis=0), size=128) + 1e-18
    coming = np.roll(-minimum_filter1d(-now, size=600), -300)
    margin_db = 10 * np.log10(now / coming) - AHEAD_DB
    return x + high * (drop_out(margin_db, AHEAD_SOFT_DB, AHEAD_DEPTH_DB) - 1)


def roll_off(x):
    return signal.sosfilt(signal.butter(12, 16970, fs=SR, output="sos"), x)


def record(dry):
    x = signal.sosfilt(signal.ellip(8, .2, 40, 15900, fs=SR, output="sos"), dry)
    mix = starve(np.tanh(x))
    return roll_off(mix)


dry = scene()
out = record(dry)
output_pcm(out)
```